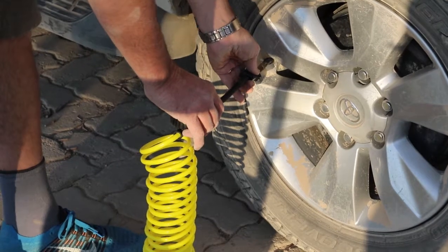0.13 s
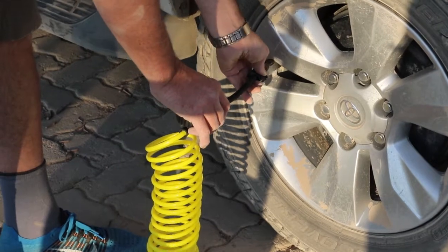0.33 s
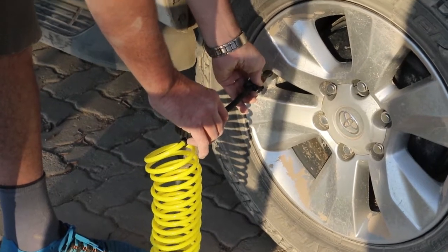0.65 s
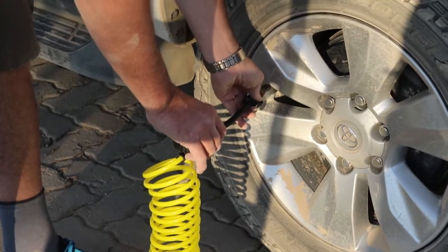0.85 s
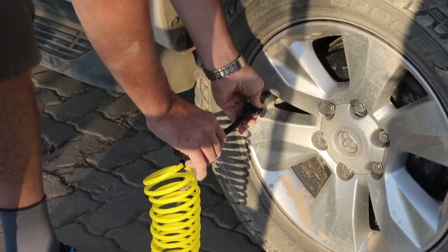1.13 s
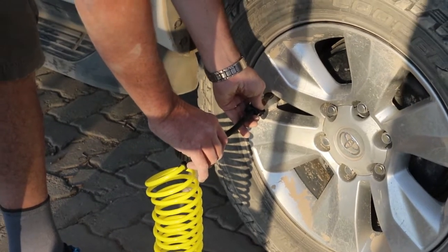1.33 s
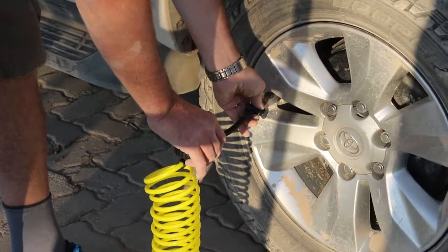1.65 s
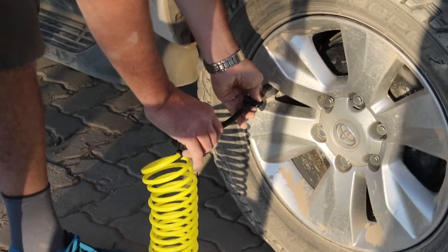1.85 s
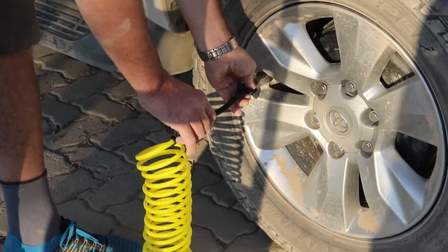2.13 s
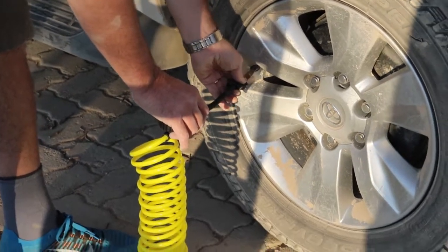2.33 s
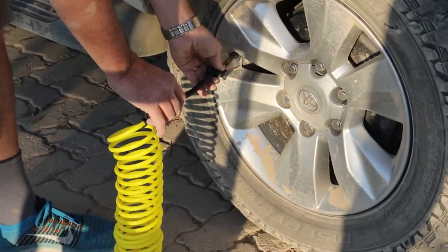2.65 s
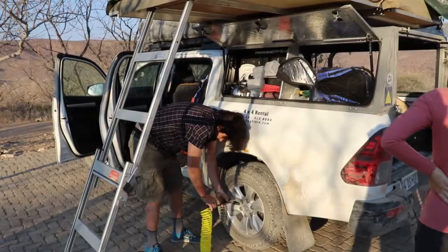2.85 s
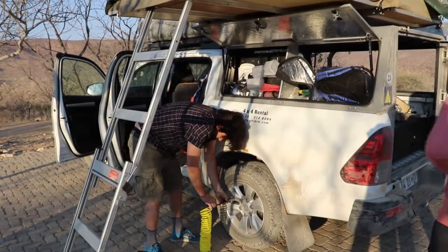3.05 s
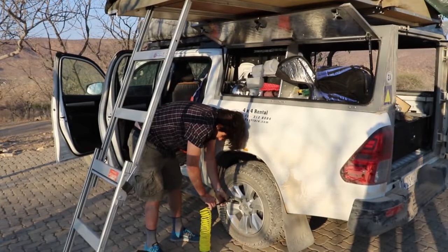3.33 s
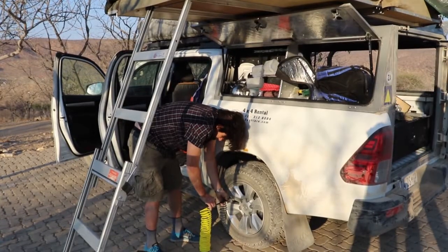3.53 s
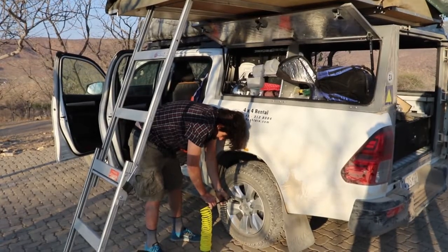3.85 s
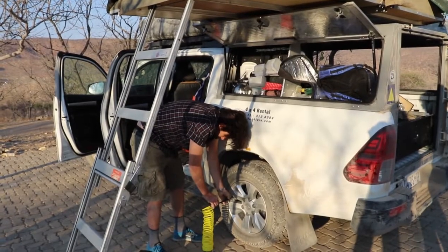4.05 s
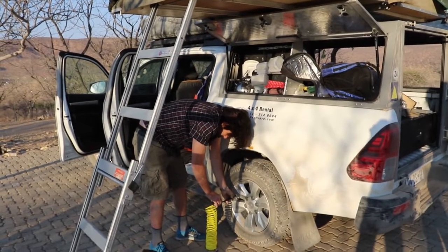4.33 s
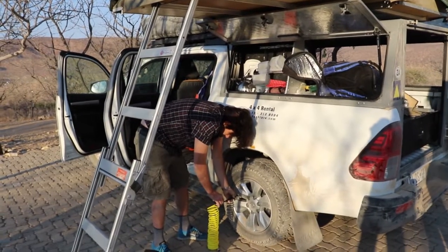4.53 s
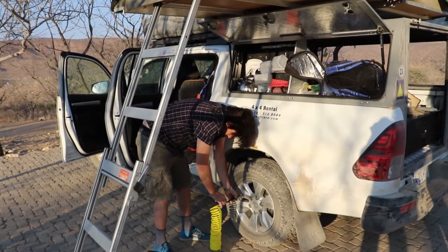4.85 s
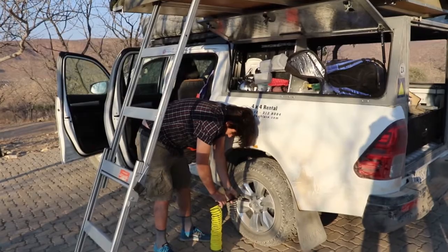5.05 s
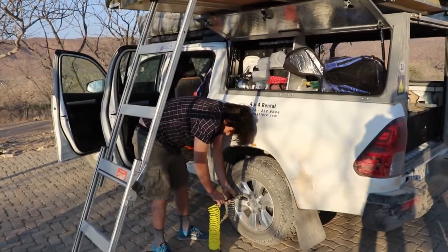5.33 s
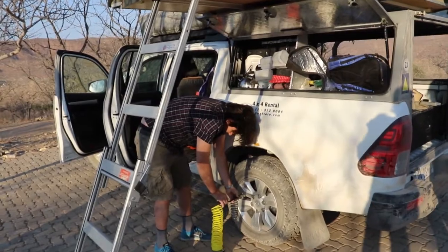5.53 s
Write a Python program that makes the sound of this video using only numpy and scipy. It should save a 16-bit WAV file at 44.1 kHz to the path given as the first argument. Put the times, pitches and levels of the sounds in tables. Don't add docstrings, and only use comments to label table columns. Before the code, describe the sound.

Outdoors on paving, a faint whisper of air and soft breeze lead at 0.23 s into a sudden loud hiss: pressurised air jetting from a tyre valve very close to the microphone. It opens with a brief harder pop, then stays bright, dense and nearly steady, with little bass, until it cuts off at 2.2 s. A weak leak lingers and fades beneath low wind rumble and rustling clothes or leaves. Small clicks, dull thuds and steps gather from 2.65 to 3.0 s, a shoe scuffs at 3.1 s, and a sharp click and short, hollow, ringing scrape come near 3.35 s. At 3.62 s the second hiss bursts out, from a few steps away, more uneven and resonant, with short reflections, stopping at 5.15 s. Faint seeping, breeze and two soft steps follow, then from 5.5 s a small metal fitting jingles brightly in quick irregular blows to the end.

```python
import sys
import numpy as np
from scipy import signal
from scipy.fft import rfft, irfft
from scipy.io import wavfile

SR = 44100
rng = np.random.default_rng(int(sys.argv[2]) if len(sys.argv) > 2 else 0)


def gain_from_db(level_db):
    decades = np.asarray(level_db, float) / 20
    return 10 ** decades


def wav_out(sig):
    wavfile.write(sys.argv[1], SR, np.round(np.clip(np.atleast_2d(sig).T, -1, 1) * 32767).astype(np.int16))


N = 251060
T = np.arange(N) / SR
F = np.arange(N // 2 + 1) * SR / N + 1e-3

# opens/s, rise/s, last step/dB, shuts/s, fall/(dB per s)
VALVE = [
    (.232, 0.026, 3, 2.203, 800),
    (3.623, .011, 3, 5.15, 895),
]
BREEZE_DB = -52.5


def curve(rows):
    times, levels = np.transpose(rows)
    return np.interp(T, times, levels)


def unit(x):
    return x / np.sqrt(np.mean(x ** 2))


def broad(points):
    hz, db = np.transpose(points)
    return gain_from_db(2 * np.interp(np.log(F), np.log(hz), db)) * np.minimum(F / hz[0], 1) ** 6


def rings(peaks):
    return sum(gain_from_db(2 * db) / (1 + (2 * (F - hz) / width) ** 2) for hz, width, db in peaks)


def noise(power):
    return irfft(rfft(rng.standard_normal(N)) * np.sqrt(power), N)


def band(x, lo, hi, order):
    return signal.sosfilt(signal.butter(order, [lo, min(hi, .45 * SR)], "bandpass", fs=SR, output="sos"), x)


def blur(grid, size, axis):
    bell = np.exp(-(np.arange(-60, 61) / size) ** 2)
    return signal.fftconvolve(grid, np.expand_dims(bell, 1 - axis), "same")


def patchy(x, slow_db, quick_db, band_hz, slow_s, quick_s):
    _, _, z = signal.stft(x, nperseg=256)
    hop, df = 128 / SR, SR / 256
    slow = blur(rng.standard_normal(z.shape), slow_s / hop, axis=1)
    slow = unit(blur(slow, band_hz / df, axis=0))
    quick = unit(blur(rng.standard_normal((1, z.shape[1])), quick_s / hop, axis=1))
    return signal.istft(z * gain_from_db(slow_db * slow + quick_db * quick), nperseg=256)[1][:N]


def gusts():
    # t/s, peak level/dB, half length/s
    puffs = [(.24, -51, .02), (1.24, -57, .07), (1.49, -54, .04), (2.49, -49, .18), (3.0, -52, .04),
             (3.13, -46, .05), (3.23, -50, .06), (3.43, -46, .05), (3.64, -45, .06), (3.8, -50, .07),
             (3.93, -50, .06), (4.22, -48, .06), (4.475, -46.5, .04), (4.75, -51, .06), (4.84, -50, .06),
             (5.07, -48.5, .08), (5.29, -49, .12), (5.6, -47.5, .15)]
    slope_db = 12
    return sum(gain_from_db(2 * (db - slope_db * np.abs(T - s) / half)) for s, db, half in puffs)


def ducking():
    late_s, creep_db_per_s, release_s = .02, 1.8, .2
    held = 0
    for (opens, _, _, shuts, _), depth_db in zip(VALVE, (11, 4.5)):
        hold = np.clip(depth_db - creep_db_per_s * (T - opens), 0, None)
        release = np.clip(1 - (T - shuts) / release_s, 0, 1)
        held = held + hold * (T > opens + late_s) * release
    return held


def breeze(blowing):
    # f/Hz, level per Hz/dB
    rumble_colour = [(15, -46), (25, -18), (125, 2), (253, 0.5), (293, -5.5), (325, -4.5), (505, -13.5),
                     (547, -9), (600, -16), (780, -45), (1320, -120)]
    power = broad(rumble_colour) * np.minimum(600 / F, 1) ** 4
    rumble = patchy(unit(noise(power)), 0.52, 0.5, 300, 0.091, 0.0033)
    return rumble * np.sqrt(gain_from_db(2 * (BREEZE_DB - ducking())) + blowing)


def rustle(blowing):
    # f/Hz, level per Hz/dB
    rustle_colour = [(240, -32), (400, -8.5), (674, -3), (1130, -6), (1320, -8), (2330, -9), (2480, -13),
                     (6410, -20.5), (7030, -37), (9550, -20), (15600, -31)]
    level_db, louder_db, louder_from_s = -56.5, 2, 2.85
    stir = .3
    stirred = (1 + blowing / gain_from_db(2 * BREEZE_DB)) ** (stir / 2)
    brushing = patchy(unit(noise(broad(rustle_colour))), 1.2, 1.17, 1200, 0.03, 0.0026)
    return brushing * gain_from_db(level_db + louder_db * (T > louder_from_s)) * stirred


def leak():
    # starts/s, peak level/dB
    starts = [
        (-.3, -62),
        (2.2, -54),
        (4.95, -58),
    ]
    # f/Hz, level per Hz/dB
    leak_colour = [(350, -26), (600, 4), (697, -15), (810, 6.5), (967, -15), (1290, -10), (1400, -16),
                   (2070, -16), (2880, 0), (5170, -15), (7270, -8.5), (9420, -13), (15600, -17.5)]
    # f/Hz, width/Hz, level/dB
    leak_ring = [(2900, 140, -15), (3600, 200, -4), (7250, 600, -2), (8440, 470, -12), (10600, 300, -13)]
    swell_s, swell_db, sag_db_per_s, far_hiss_db = .3, 3.5, 24, -61
    level_db = np.zeros(N)
    for s, peak_db in starts:
        age = T - s - swell_s
        drop_db = np.where(age < 0, -age * swell_db / swell_s, age * sag_db_per_s)
        level_db = np.where(T >= s, peak_db - drop_db, level_db)
    seeping = unit(noise(broad(leak_colour) * gain_from_db(1) + rings(leak_ring)))
    seeping = patchy(seeping, 0.98, .6, 400, 0.11, .006)
    return seeping * gain_from_db(level_db) + unit(noise(broad(leak_colour))) * gain_from_db(far_hiss_db)


def ticks(rows, wide, t60):
    out = np.zeros(N)
    chance = rng.standard_normal((len(rows), 8192))
    chance[:, 0] = 5
    for (s, db, hz), grit in zip(rows, chance):
        dying = grit * np.exp(-np.log(1000) * T[:len(grit)] / t60)
        knock = band(dying, hz / (1 + wide / 2), hz * (1 + wide / 2), order=2)
        i = int(s * SR)
        out[i:i + len(knock)] += (gain_from_db(db) * knock / np.abs(knock).max())[:N - i]
    return out


def small_contacts():
    # t/s, peak level/dB, centre f/Hz
    bumps = [(2.071, -41, 167), (2.068, -43, 306), (3.42, -45, 330), (3.42, -44, 167)]
    # t/s, peak level/dB, centre f/Hz
    thuds = [(2.253, -42, 490), (2.846, -39.5, 119), (2.856, -34.5, 183), (2.866, -44, 250),
             (2.995, -33.5, 320), (3.419, -42, 249)]
    # t/s, peak level/dB, centre f/Hz
    steps = [(2.806, -40, 1500), (2.997, -29.5, 1480), (3.47, -43, 2200), (5.308, -36.5, 800),
             (5.408, -39, 900), (.003, -40, 900), (3.52, -45, 1000)]
    # t/s, peak level/dB, centre f/Hz
    brushes = [(2.805, -41, 9000), (2.95, -43, 4500), (2.997, -37, 5000), (3.012, -41.5, 3400),
               (3.348, -43, 2900), (3.43, -45, 11000), (3.572, -49, 9000), (5.316, -45, 2500),
               (5.417, -43, 3000)]
    # t/s, peak level/dB, centre f/Hz
    clicks = [(2.648, -45, 5000), (2.752, -40, 5500), (2.752, -38, 9000), (2.805, -41, 3500),
              (3.3305, -40, 2800), (3.3412, -31.5, 3100), (3.341, -38, 7000), (5.361, -41, 8500),
              (5.445, -46, 12200)]
    low = ticks(bumps, wide=.22, t60=.28) + ticks(thuds, wide=.7, t60=.06)
    feet = ticks(steps, wide=2.0, t60=.1) + ticks(brushes, wide=1.0, t60=.06)
    return low + feet + ticks(clicks, wide=.65, t60=.007)


def rubbing(stroke, ring):
    s, attack, hold, release, db = stroke
    edge_db = 22
    ramp = np.minimum((T - s) / attack, (s + attack + hold + release - T) / release)
    return unit(noise(rings(ring))) * gain_from_db(db - edge_db * (1 - np.clip(ramp, 0, 1))) * (ramp > 0)


def scuff():
    # starts/s, attack/s, hold/s, release/s, level/dB
    drag = (3.09, .03, .12, .03, -53)
    # f/Hz, width/Hz, level/dB
    sole_ring = [(900, 320, -3), (1600, 200, 1), (2600, 900, -13)]
    return rubbing(drag, sole_ring)


def scrape():
    # starts/s, attack/s, hold/s, release/s, level/dB
    stroke_row = (3.365, .045, .025, .07, -43.5)
    # f/Hz, width/Hz, level/dB
    hollow_ring = [(320, 25, 4), (860, 120, -2), (1150, 32, 5), (1569, 18, 4), (1950, 25, -5),
                   (2330, 30, -1), (3030, 80, -16), (3430, 80, -13), (4200, 4100, -27), (6380, 80, -21),
                   (9290, 60, -17)]
    return rubbing(stroke_row, hollow_ring)


def seep():
    # starts/s, attack/s, hold/s, release/s, level/dB
    whispers = [
        (-.1, .05, .1, .25, -56),
        (.04, .12, .06, .02, -58.5),
    ]
    # f/Hz, width/Hz, level/dB
    gap_ring = [(12300, 510, 0), (9000, 6000, -10), (3700, 1500, -14)]
    return sum(rubbing(row, gap_ring) for row in whispers)


def jingle():
    # t/s, level/dB, dull body level/dB, upper partials level/dB
    blows = [(5.4883, -42, 6, -6), (5.498, -48, 4, -2), (5.506, -46, 5, 2), (5.5704, -29.5, -14, -9),
             (5.583, -41, -11, -2), (5.595, -47, -7, 2), (5.6136, -32.5, -5, -8), (5.624, -36, -1, -1),
             (5.636, -41, 1, -1), (5.6525, -35.5, -2, -9), (5.663, -34.5, -2, -5), (5.675, -43, 0, 1),
             (5.687, -42, -3, 0)]
    # f/Hz, level/dB, t60/s
    bright = [(3542, 0.5, 0.082), (3570, -18, .03), (4613, -13, .06), (5050, -22, .04), (5930, -15, .04),
              (6000, -11, 0.055), (6260, -18, .03), (6920, -12, 0.033), (7400, -14, .04), (8053, -18, .03),
              (8840, -26, .03), (9000, -16, .06), (10630, -30, 0.046), (11800, -30, .04)]
    # f/Hz, level/dB, t60/s
    body = [(1520, -13, 0.056), (1573, 0, 0.06), (1670, -0.5, 0.072), (1860, 1, 0.043), (2070, 0, 0.036),
            (2260, -9, .04), (2560, -5, 0.077), (2780, -6, 0.045), (3020, -14, .04)]
    out, age = np.zeros(N), T[:12000]
    gaps = np.diff(np.array(blows)[:, 0], prepend=0)
    for (s, db, body_db, top_db), gap in zip(blows, gaps):
        chatter_s = .0025 if gap > .016 else .007
        modes = [(hz, d + top_db * (hz > 4000), t60) for hz, d, t60 in bright]
        modes += [(hz, d + body_db, t60) for hz, d, t60 in body]
        ring = 0
        for hz, d, t60 in modes:
            louder, sharper = rng.standard_normal(2)
            fading = gain_from_db(d + 1.5 * louder) * np.exp(-np.log(1000) * age / t60)
            ring = ring + fading * np.sin(2 * np.pi * hz * (1 + .0015 * sharper) * age)
        blow = rng.standard_normal(2000) * np.exp(-age[:2000] / chatter_s)
        hit = signal.fftconvolve(blow / np.sqrt(np.sum(blow ** 2)), ring)
        i = int(s * SR)
        out[i:i + len(hit)] += gain_from_db(db) * (hit * np.linalg.norm(ring) / np.linalg.norm(hit))[:N - i]
    return band(out, 1800, 15000, order=3)


def jet(valve, flow, lower, colour, ring):
    # f/Hz, width/Hz, level/dB
    port_ring = [(15300, 300, -10)]
    opens, rise, step_db, shuts, fall = valve
    hiss_db, boom_db, pop_hiss_db, pop_boom_db = lower
    power = broad(colour) * gain_from_db(-1.5) + rings(ring + port_ring)

    follow, steady_db, build_db, build_s = .6, -19.5, 6.5, .42
    flow_db = curve(flow)
    filling = follow * (flow_db - steady_db) - build_db * np.exp(-np.clip(T - opens, 0, None) / build_s)
    pop = np.exp(-np.clip(T - flow[0][0], 0, None) / .022)
    low_hiss_db = hiss_db + filling + pop_hiss_db * pop
    rim_boom_db = boom_db + filling + pop_boom_db * pop ** (1 / 2.4)

    regions = [(5500, 15500, F >= 5500, flow_db),
               (3000, 5500, (F >= 3000) & (F < 5500), low_hiss_db),
               (800, 3000, F < 3000, rim_boom_db)]
    hiss = 0
    for lo, hi, share, db in regions:
        inside = power[(F > lo) & (F < hi)].sum() / (power * share).sum()
        hiss = hiss + unit(noise(power * share)) * gain_from_db(db) / np.sqrt(inside)

    gate_db = -np.where(T < opens, step_db + 24 * (opens - T) / rise, 0)
    after = np.clip(T - shuts, 0, None)
    gate_db = gate_db - np.minimum(fall * after, 22 + 0.34 * fall * after)
    hiss = patchy(hiss, slow_db=0.47, quick_db=0.06, band_hz=510, slow_s=0.026, quick_s=0.0026)
    return hiss * gain_from_db(gate_db) * (T > opens - rise)


def reflect(x, echo_db, t60, drift_s):
    turn = T / drift_s
    out = x
    for k in range(int(turn[-1]) + 2):
        cluster = rng.standard_normal(2048) * np.exp(-np.log(1000) * T[:2048] / t60)
        near = np.flatnonzero(np.abs(turn - k) < 1)
        part = x[near] * np.cos(np.pi / 2 * (turn[near] - k))
        echo = signal.fftconvolve(part, cluster / np.sqrt(np.sum(cluster ** 2)))
        out = out + np.pad(gain_from_db(echo_db) * echo, (near[0], N))[:N]
    return out / np.sqrt(1 + gain_from_db(2 * echo_db))


def air_bursts():
    # t/s, level/dB
    flows = [
        [(0.235, -16), (0.267, -16.5), (0.337, -16), (0.387, -19), (1.005, -18.5), (2.143, -19), (2.2, -21.5)],
        [(3.626, -23.5), (3.654, -17), (3.68, -17), (3.842, -20.5), (4.066, -18.5), (4.316, -21.5),
         (4.45, -18.5), (4.94, -20.5), (5.15, -20.3)],
    ]
    # lower hiss/dB, rim boom/dB, opening pop in hiss/dB, pop in boom/dB
    lowers = [
        (-27.5, -37.3, 12, 12),
        (-25.8, -35.8, 6, 11),
    ]
    # f/Hz, level per Hz/dB
    near_colour = [(290, -65), (500, -33), (537, -32), (804, -15.5), (998, -15.5), (1120, -23.5),
                   (1390, -13.5), (2020, -15), (3860, -1), (5300, -7.5), (6670, 0), (11200, -4.5),
                   (12600, -1.5), (15600, -14.5)]
    # f/Hz, level per Hz/dB
    far_colour = [(290, -60), (500, -29), (738, -19), (804, -29), (956, -11), (1220, -11.5), (1540, -16),
                  (1770, -13.5), (3070, -9.5), (4150, 0), (4660, -7), (9290, -6), (14300, -7),
                  (15600, -20.5)]
    # f/Hz, width/Hz, level/dB
    near_ring = [(1012, 83, -9.5), (1370, 140, -10.5), (2224, 50, -9.5), (2830, 90, -13), (3950, 150, -3.5),
                 (4460, 290, -1.5), (5120, 66, -6), (5820, 130, -3.5), (6800, 370, -4.5), (7700, 100, -10),
                 (9150, 100, 0.5), (9860, 80, -5), (10300, 280, -1.5), (12400, 220, -10),
                 (14900, 250, -5.5)]
    # f/Hz, width/Hz, level/dB
    far_ring = [(1210, 30, -7.5), (1455, 8, -4), (1803, 35, -6.5), (1960, 42, -7.5), (2380, 38, -9.5),
                (2750, 23, -13), (3350, 200, -15), (4150, 130, -1), (4670, 51, -18), (5100, 180, -7),
                (5440, 27, -4), (5950, 310, -9), (6760, 230, -3.5), (7230, 96, -22.5), (8000, 400, -3.5),
                (9230, 140, 0.5), (10000, 180, -9), (11000, 100, -4), (12500, 49, -23.5), (12900, 200, -8),
                (13700, 390, -26), (14600, 59, -7)]
    near_jet = jet(VALVE[0], flows[0], lowers[0], near_colour, near_ring)
    far_jet = jet(VALVE[1], flows[1], lowers[1], far_colour, far_ring)
    return reflect(near_jet + far_jet, echo_db=-9, t60=0.043, drift_s=0.4576)


def scene():
    blowing = gusts()
    around = breeze(blowing) + rustle(blowing) + leak() + small_contacts()
    rubs = scuff() + scrape() + seep()
    return np.tile(around + rubs + jingle() + air_bursts(), (2, 1))


def band_noise(mono, s, lo, hi):
    i = 295 + 1024 * max(round((s * SR - 1319) / 1024), 0)
    bins = np.arange(int(lo * 2048 / SR), int(hi * 2048 / SR))
    window = signal.windows.kaiser_bessel_derived(2048, 4 * np.pi)
    waves = np.cos(np.pi / 1024 * np.outer(bins + .5, np.arange(2048) + 512.5))
    basis = window * waves / np.sqrt(512)
    size = np.sqrt(np.mean((basis @ mono[i:i + 2048]) ** 2))
    return i, size * rng.standard_normal(len(bins)) @ basis


def stereo_flecks(mono):
    # t/s, number of bands
    moments = [(.035, 2), (.38, 1), (1.0, 2), (1.075, 3), (1.45, 2), (2.165, 1), (3.3, 3), (3.675, 1),
               (4.165, 2), (5.255, 1)]
    from_hz, to_hz, wide_hz = 4400, 14600, 900
    side = np.zeros(N)
    for s, count in moments:
        places = (np.arange(count) + rng.random(count)) / count
        for lo in from_hz + (to_hz - from_hz) * places:
            i, wave = band_noise(mono, s, lo, lo + wide_hz)
            side[i:i + len(wave)] += wave
    return side


def top_cut(x):
    return signal.sosfilt(signal.butter(12, 16030, fs=SR, output="sos"), x)


def record(dry):
    mono = signal.sosfilt(signal.butter(2, 60, "highpass", fs=SR, output="sos"), dry[0])
    top_edge = np.sin(np.pi / 2 * np.clip((15790 - F) / 70, 0, 1)) ** 2
    mono = irfft(rfft(mono) * top_edge, N)
    side = stereo_flecks(mono)
    return top_cut(mono + np.array([side, -side]))


dry = scene()
out = record(dry)
wav_out(out)
```